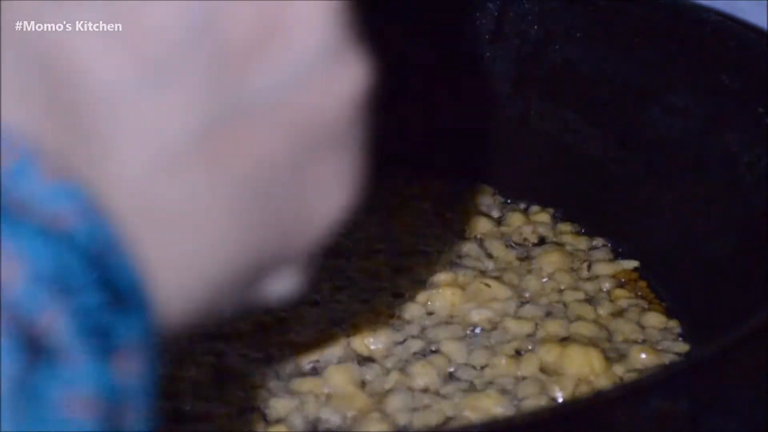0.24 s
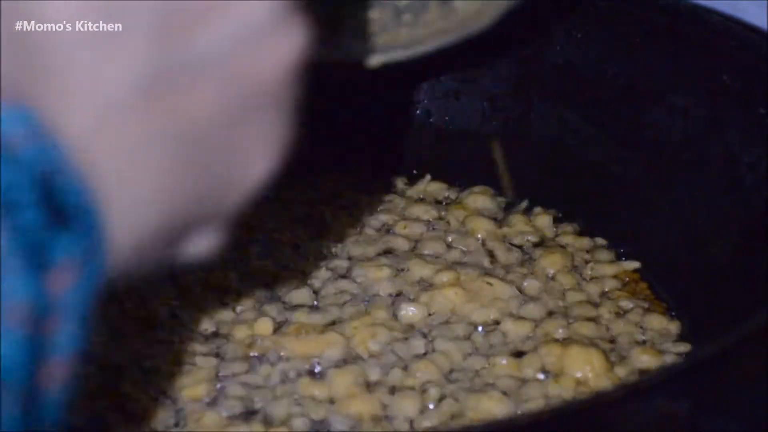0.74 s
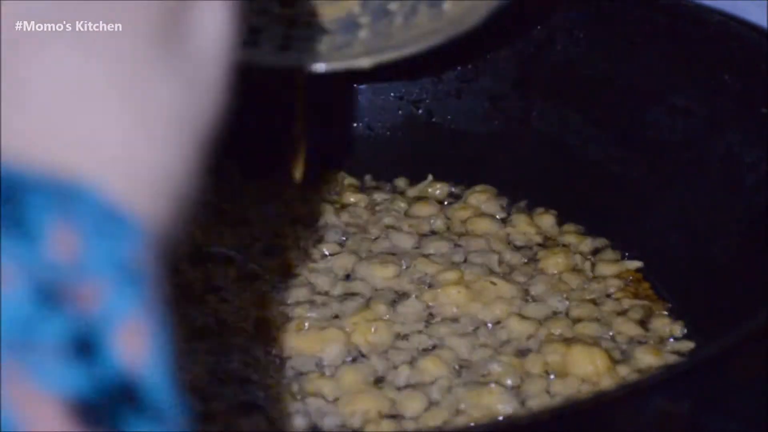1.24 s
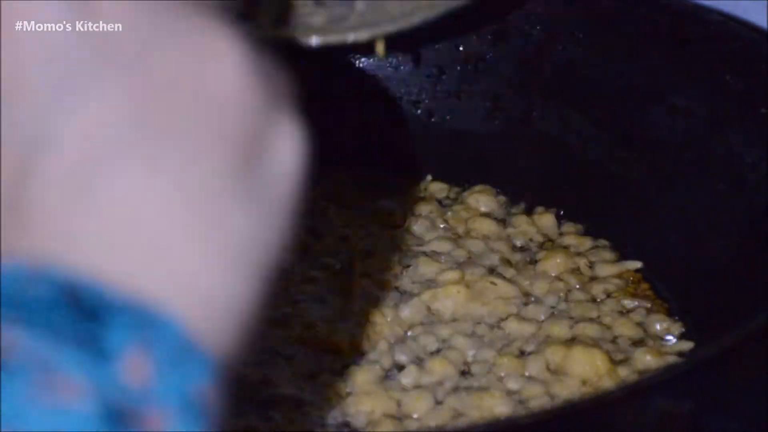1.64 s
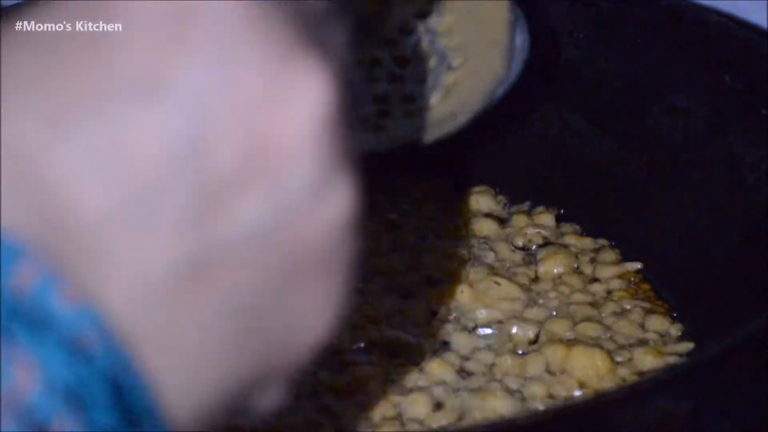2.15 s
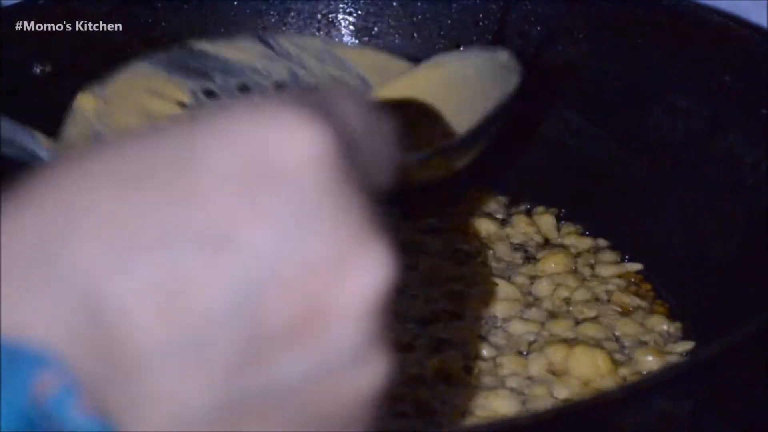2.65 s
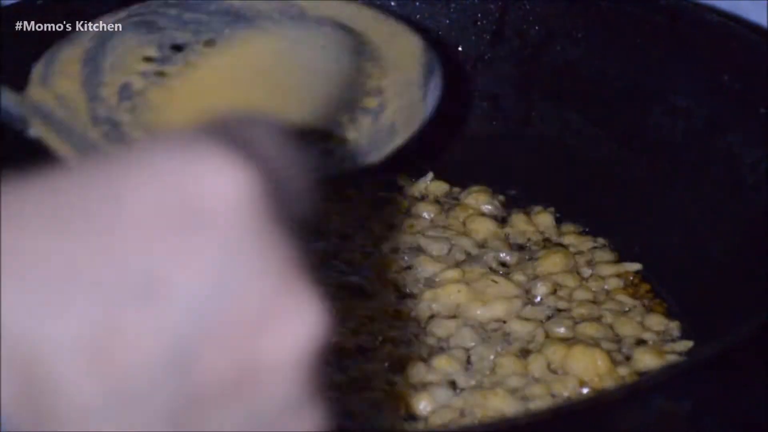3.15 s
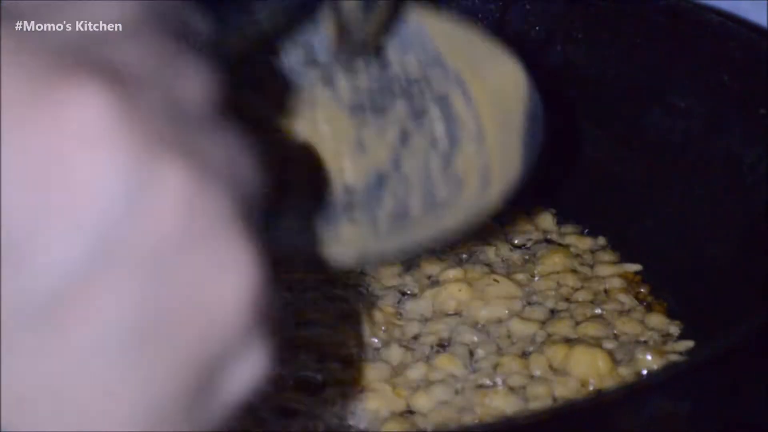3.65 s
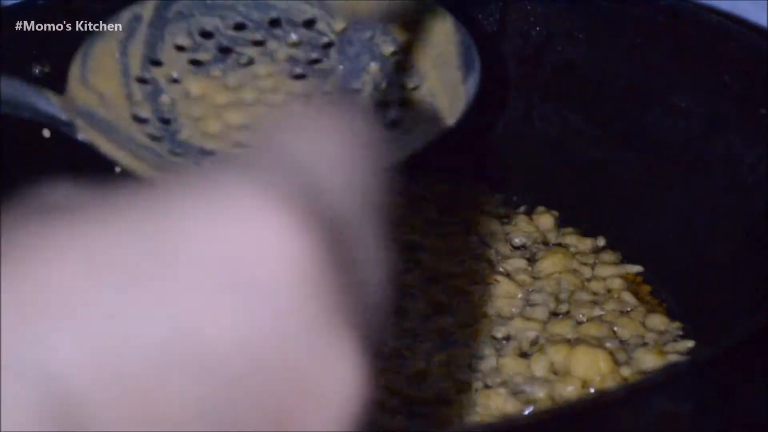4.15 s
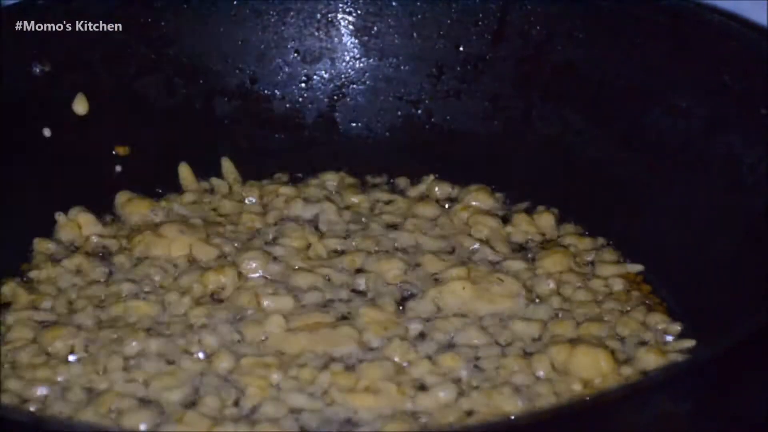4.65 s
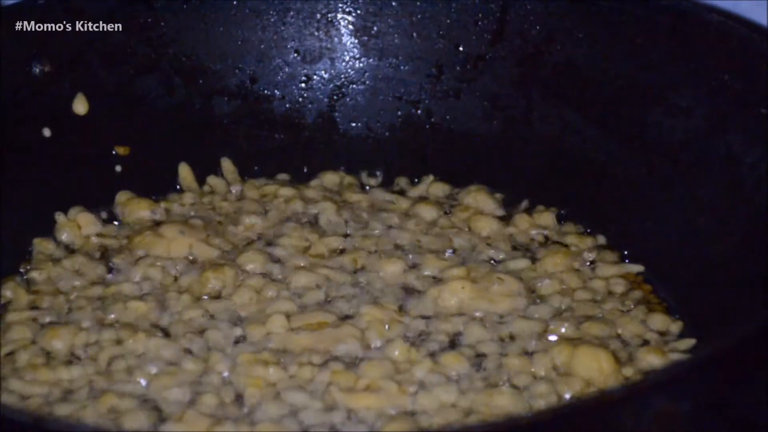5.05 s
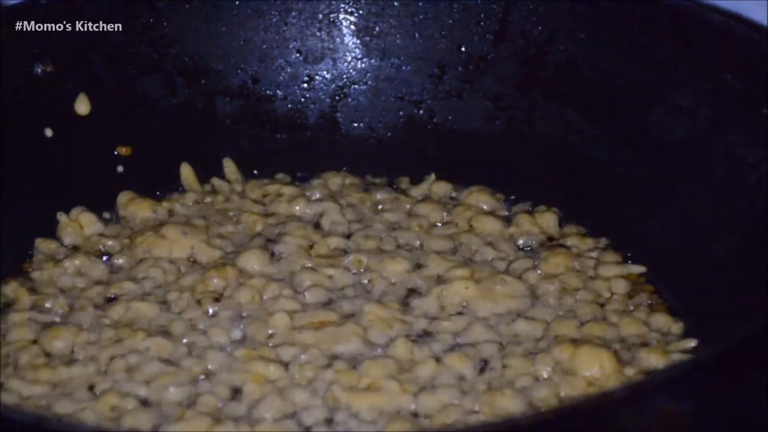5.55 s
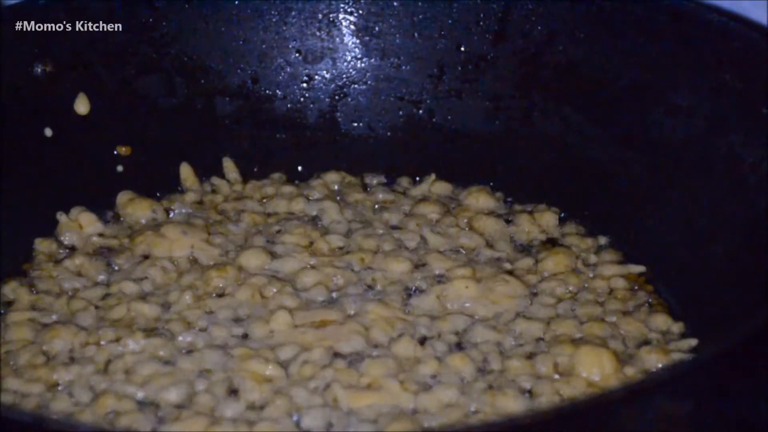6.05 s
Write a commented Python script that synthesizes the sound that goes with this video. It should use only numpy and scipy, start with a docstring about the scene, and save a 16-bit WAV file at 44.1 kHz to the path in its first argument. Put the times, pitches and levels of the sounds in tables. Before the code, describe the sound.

A metal spoon taps a wok's rim four times quickly, then is put down with a clink and soft knocks.

```python
"""Knocking a spoon on a wok

In a small kitchen, a slotted metal spoon hits a wok's rim four times to shake off batter. Each tap
makes the spoon clack and the wok ring. The spoon scrapes and ticks lightly around the taps, then is
put down with a clink and a few soft knocks. Hits are short puffs of shaped noise, and ringing is a
sum of fading tones. Faint squeaks and a steady room noise lie underneath."""
import sys
import numpy as np
from scipy import signal
from scipy.fft import rfft, irfft
from scipy.io import wavfile
from scipy.ndimage import uniform_filter1d

SR = 44100
rng = np.random.default_rng(int(sys.argv[2]) if len(sys.argv) > 2 else 0)


def to_wav(sig):
    """Store sig (one row per channel, or 1-D mono) as 16-bit WAV at the path in sys.argv[1].

    Samples outside -1..1 are clipped; the rate is SR.
    """
    pcm = np.clip(np.atleast_2d(sig), -1, 1) * 32767
    pcm = np.round(pcm).astype(np.int16)
    wavfile.write(sys.argv[1], SR, pcm.T)  # frames by channels


N = 278271

# Levels in the tables are relative. A t60 is the time a sound takes to fade by 60 dB.
# Hard taps on the rim, each with a bright zing: start_s, level_db, zing_hz, zing_db
RIM_TAPS = [(1.3150, -7.5, 6354, -6.5), (1.4700, -4.5, 7970, -3.5), (1.6468, -2.5, 6187, -1),
            (1.8374, -1.5, 7936, -5.5)]
# The spoon's resonances (pitches it likes to shake at), damped by the hand: pitch_hz, width_hz, level_db
HELD_SPOON = [(738.5, 106, -8), (930.4, 152, -5.5), (1183, 238, -6.5), (1428.3, 72.5, 1), (1979, 79, -4),
              (2256, 142, 1.5), (2390, 126, 0.5), (2846, 330, -0.5), (3186, 80, -2.5), (3693, 225, -8),
              (3906, 148, 1.5), (4720, 235, -8.5), (5995, 375, -5.5), (6184, 197, -5), (6940, 200, -20.5),
              (7100, 120, -15.5), (8196, 490, -5.5), (9930, 256, -8), (10150, 136, -18), (11170, 580, -14),
              (12020, 740, -13)]
# The tone colour of metal cracking on metal: frequency_hz, level_db
CRACK_COLOUR = [(40, -49), (150, -22), (300, -29), (500, -4), (640, -9), (750, 0), (1500, 2), (3000, 4.5),
                (5000, 0), (8000, -18.5), (11500, -12), (14000, -5), (16000, -24.5)]
# What a tap sends into the room, all directions together: frequency_hz, level_db
RADIATED_COLOUR = [(40, -55), (150, -32), (400, -23), (520, -10), (640, -13), (750, -7.5), (1100, 0),
                   (1800, 0), (2700, -1), (3400, -6.5), (4700, -5), (5500, -8), (6200, -6), (8200, -12),
                   (9500, -10.5), (14000, -17), (16000, -33)]
# The wok's ringing tones: pitch_hz, level_db, t60_s
WOK_TONES = [(735, -9, .3), (1175, -8, .26), (1265, -10, .36), (1335, -9, .26), (1518, -6, .25),
             (1778, -7, .24), (1902, -9, .26), (2228, -7, .22), (2654, -2, .24), (2804, -7, .2),
             (3628, -3, .39), (3661, 0, .33), (3700, -1, .32), (3750, -4, .3), (3950, -1, .22),
             (4530, -9, .17), (6222, -12, .19), (9308, -18, .21)]
# Light touches of the held spoon on the wok: start_s, level_db, centre_hz, zing_hz
LIGHT_TOUCHES = [(0.301, -48.5, 3000, 7200), (0.777, -44.5, 3350, 3885), (2.492, -45, 3450, 4140),
                 (2.7956, -29, 1600, 3380), (4.045, -53, 6000, 6620), (4.2904, -20.5, 2575, 3965)]
# The tone colour of a bright tick: frequency_hz, level_db
TICK_COLOUR = [(200, -48), (1500, -12.5), (4500, 9.5), (6500, 17.5), (9000, 10), (12000, 7.5), (16000, -16)]
# Slips of the spoon's edge along the wok: start_s, level_db, decay_s
EDGE_SLIPS = [(.990, -28, 0.011), (1.003, -27, 0.0206), (1.041, -34, 0.0107)]
# The spoon lands and bounces: start_s, level_db, hardness (0 soft to 1 hard)
SPOON_LANDINGS = [(4.9594, -31, .02), (4.9746, -26.5, 0.83), (5.0399, -25, 0.98)]
# The tones of the spoon ringing freely: pitch_hz, level_db, t60_s
CLINK_TONES = [(499, -9.5, 0.106), (839.3, 4, 0.193), (1200, -5.5, 0.12), (1549, 7.5, 0.159),
               (2234, 0.5, 0.16), (2584, 12, 0.075), (3890, -2.5, 0.15), (5451, 1, 0.186),
               (5510, -4.5, 0.142), (7330, -4, 0.132)]
# Dull knocks afterwards, each with a ping: start_s, level_db, centre_hz, decay_s, ping_db
WORKTOP_KNOCKS = [(5.309, -36.5, 1104, 0.015, -17.5), (5.321, -28, 740, 0.0149, -24.5),
                  (5.5593, -30, 774, 0.011, 3)]
# The ping of a knocked, well-damped utensil: pitch_hz, level_db, t60_s
PING_TONES = [(2460, 0.5, 0.043), (3196, -6, 0.067), (4249, -1, 0.036), (4474, -6, 0.031),
              (7300, -16, .035)]
# Faint, far-off squeaks: start_s, length_s, pitch_hz, level_db
FAR_SQUEAKS = [(3.62, 0.1796, 1122, -57.5), (3.82, 0.078, 1127, -57), (3.889, 0.0733, 1344, -57),
               (4.044, 0.053, 1353, -56), (4.18, 0.0596, 1851, -64)]
# A thin whistle that comes and goes: start_s, length_s, level_db
FAR_WHISTLES = [(0.58, 0.47, -77), (2.08, 0.143, -63.5), (2.24, 0.095, -68)]
# A soft, very low bump: start_s, length_s, pitch_hz, level_db
LOW_BUMPS = [(4.6, .12, 44, -66)]
# The tone colour of the air noise: frequency_hz, level_db
AIR_COLOUR = [(25, -9), (50, 0.5), (100, -3), (180, 1.5), (270, -4), (400, -1), (700, -1), (1200, 1),
              (2000, -3), (3200, -10.5), (4800, -17.5), (7000, -13), (10000, -20.5), (15500, -29)]
# Resonances in the room noise: pitch_hz, width_hz, level_db
DRONE_PEAKS = [(108.6, 3.85, 0.5), (186.2, 13, -3.5), (340.5, 21.6, 7), (520, 51.8, 1.5), (561.7, 14, -4.5),
               (737.6, 7.8, 9.5), (766, 13, -14.5)]
# How long the kitchen echoes: frequency_hz, t60_s
ECHO_TIMES = [(200, 0.387), (1000, 0.446), (3000, 0.385), (7000, 0.349), (14000, 0.245)]


def taps(clack_db=5, crack_db=-4, crack_decay_s=0.00197, zing_decay_s=0.00322, zing_room_db=-9):
    """The spoon hits the rim: it clacks, the contact cracks and zings, and the room answers."""
    _, hz = axes()
    treble_octaves = np.clip(np.log2((hz + 1) / 3500), 0, 2)
    direct, into_room = np.zeros((2, N))
    for start_s, db, zing_hz, zing_db in RIM_TAPS:
        treble_db = (-1.16 + 0.148 * db) * treble_octaves  # a harder tap is brighter
        crack = amp(crack_db) * burst(crack_decay_s, curve(CRACK_COLOUR, hz))
        zing = amp(zing_db) * burst(zing_decay_s, hump(hz, zing_hz, octaves=0.0753))
        radiated = burst(crack_decay_s, curve(RADIATED_COLOUR, hz) + treble_db)
        clack = amp(clack_db) * spoon_clack()
        add(direct, start_s, amp(db) * (zing + coloured(clack + crack, treble_db)))
        add(into_room, start_s, amp(db) * (amp(zing_room_db) * zing + radiated))
    return direct + kitchen_echo(into_room)


def spoon_clack(decay_s=0.00191, valley_db=-20):
    """The blow spreads through the spoon's broad resonances, which the hand quickly damps."""
    _, hz = axes()
    valley_power = amp(valley_db + curve(RADIATED_COLOUR, hz)) ** 2  # fills the gaps between peaks
    return burst(decay_s, 10 * np.log10(peak_power(HELD_SPOON, hz) + valley_power))


def wok_ring(level_db=-9):
    """The loaded wok rings briefly after each tap, equally strongly each time."""
    out = np.zeros(N)
    for start_s, *_ in RIM_TAPS:
        add(out, start_s, amp(level_db) * ring(*np.transpose(WOK_TONES)))
    return out


def touches(level_db=4, zing_db=-1, ring_db=-4, t60_share=0.356, echo_db=-6.5):
    """The held spoon clicks on the wok, waking the tones near the click's pitch but also damping them."""
    _, hz = axes()
    wok_hz, wok_db, t60_s = np.transpose(WOK_TONES)
    out = np.zeros(N)
    for start_s, db, centre_hz, zing_hz in LIGHT_TOUCHES:
        decay_s = 0.00477 * 2 ** ((-21.5 - db) / 26.5)  # a firm touch is short, a faint one brushes longer
        zing = amp(zing_db) * burst(decay_s, hump(hz, zing_hz, octaves=0.07))
        click = contact(decay_s, centre_hz, octaves=0.57, tick_db=-4.5)
        woken_db = wok_db + hump(wok_hz, centre_hz, octaves=0.134)
        ringing = amp(ring_db) * ring(wok_hz, woken_db, t60_share * t60_s)
        add(out, start_s, amp(db + level_db) * (click + zing + ringing))
    return out + amp(echo_db) * kitchen_echo(out)


def scrape(pitch_hz=2879, overtone_db=-9, echo_db=-6):
    """The spoon's edge sticks and slips; each slip is a short, rough squeal with two overtones."""
    _, hz = axes()
    out = np.zeros(N)
    for start_s, db, decay_s in EDGE_SLIPS:
        squeal = sum(amp(overtone_db) ** np.log2(k) * burst(decay_s, hump(hz, k * pitch_hz, 0.061))
                     for k in (1, 2, 3))
        click = contact(decay_s, pitch_hz, octaves=0.203, tick_db=-9)
        add(out, start_s, amp(db) * unit(squeal + click))
    return out + amp(echo_db) * kitchen_echo(out)


def landings(level_db=5, thud_db=-4, clink_db=2.5, echo_db=-4, ring_echo_db=-11):
    """Once let go, the spoon thuds and clinks; a harder landing is higher, shorter and rings more."""
    soft_hz, hard_hz = 856, 1742
    soft_decay_s, hard_decay_s = 0.0071, 0.00304
    _, hz = axes()
    hits, rings = np.zeros((2, N))
    for start_s, db, hardness in SPOON_LANDINGS:
        centre_hz = soft_hz * (hard_hz / soft_hz) ** hardness
        decay_s = soft_decay_s * (hard_decay_s / soft_decay_s) ** hardness
        muffled_db = -27 * (1 - hardness) ** 2
        zing_db = -2 + 5 * hardness ** 4
        zing = amp(zing_db) * burst(decay_s, hump(hz, 1.788 * centre_hz, octaves=0.08))
        thud = amp(thud_db) * burst(soft_decay_s, hump(hz, centre_hz=800, octaves=0.35))
        click = contact(decay_s, centre_hz, octaves=0.97, tick_db=-12 + muffled_db)
        clink = amp(clink_db + muffled_db) * ring(*np.transpose(CLINK_TONES))
        add(hits, start_s, amp(db + level_db) * (thud + click))
        add(rings, start_s, amp(db + level_db) * (zing + clink))
    return hits + rings + kitchen_echo(amp(echo_db) * hits + amp(ring_echo_db) * rings)


def knocks(level_db=5, echo_db=-4, ping_echo_db=-13):
    """Dull knocks on the worktop, each with a short ping from the utensil."""
    thuds, pings = np.zeros((2, N))
    for start_s, db, centre_hz, decay_s, ping_db in WORKTOP_KNOCKS:
        thud = contact(decay_s, centre_hz, octaves=0.91, tick_db=-19.5)
        add(thuds, start_s, amp(db + level_db) * thud)
        add(pings, start_s, amp(db + level_db + ping_db) * ring(*np.transpose(PING_TONES)))
    return thuds + pings + kitchen_echo(amp(echo_db) * thuds + amp(ping_echo_db) * pings)


def squeaks():
    """A run of rough squeaks that slide upward; the longer ones rise less."""
    out = np.zeros(N)
    for start_s, length_s, hz, db in FAR_SQUEAKS:
        rise = 0.0535 * (0.0778 / length_s) ** 2
        add(out, start_s, amp(db) * thin_tone(length_s, hz, rise, waver=0.0129, octave_db=-11))
    return out


def whistles(base_hz=3238, sag_hz_per_s=28):
    """A nearly pure whistle, a little lower each time it comes back."""
    out = np.zeros(N)
    for start_s, length_s, db in FAR_WHISTLES:
        hz = base_hz - sag_hz_per_s * start_s
        add(out, start_s, amp(db) * thin_tone(length_s, hz, rise=0, waver=0.00303, octave_db=-41.5))
    return out


def low_bump():
    """A few soft waves of deep bass."""
    out = np.zeros(N)
    for start_s, length_s, hz, db in LOW_BUMPS:
        t = np.arange(int(length_s * SR)) / SR
        add(out, start_s, amp(db) * np.hanning(len(t)) * np.sin(2 * np.pi * hz * t))
    return out


def kitchen_echo(sound, first_wall_s=0.004, early_db=-2, early_decay_s=0.0273):
    """Sound bounces off the near walls in many quick echoes; the highest pitches die first."""
    t = np.arange(SR) / SR
    echoes = rng.choice([-1, 1], SR) * (rng.random(SR) < 0.15) * (t > first_wall_s)
    echoes = echoes * (1 + amp(early_db) * np.exp(-t / early_decay_s))
    hz, when_s, bands = signal.stft(echoes, SR, nperseg=256)
    bands = bands * np.exp(-np.log(1000) * when_s / curve(ECHO_TIMES, hz)[:, None])
    fading_echoes = unit(signal.istft(bands, SR, nperseg=256)[1])
    return signal.fftconvolve(sound, fading_echoes)[:N]


def room_noise(air_db=-62.242, drone_db=-73):
    """Steady air noise, with a faint drone at a few pitches."""
    hz = np.fft.rfftfreq(N, 1 / SR)
    air = irfft(rfft(rng.standard_normal(N)) * amp(curve(AIR_COLOUR, hz)), N)
    drone = irfft(rfft(rng.standard_normal(N)) * np.sqrt(peak_power(DRONE_PEAKS, hz)), N)
    return np.sqrt(N) * (amp(air_db) * unit(air) + amp(drone_db) * unit(drone))


def contact(decay_s, centre_hz, octaves, tick_db):
    """A light hit: one broad resonance with a bright tick on top."""
    _, hz = axes()
    body = burst(decay_s, hump(hz, centre_hz, octaves))
    return body + amp(tick_db) * burst(decay_s, curve(TICK_COLOUR, hz))


def burst(decay_s, colour_db):
    """Countless quickly dying vibrations blur into a puff of noise with the given tone colour."""
    t, _ = axes()
    spectrum = rfft(rng.standard_normal(len(t)) * np.exp(-(t / decay_s) ** 1.4))
    even = irfft(spectrum / (abs(spectrum) + 1e-12), len(t))  # all frequencies equally strong
    puff = even * np.exp(-t / (10 * decay_s))
    return unit(coloured(puff, colour_db))


def ring(hz, db, t60_s):
    """Struck metal rings with pure tones, each fading at its own speed."""
    t, _ = axes()
    cycles = hz[:, None] * t + rng.random((len(hz), 1))
    fade = np.exp(-np.log(1000) * t / t60_s[:, None])
    return unit(amp(db) @ (fade * np.sin(2 * np.pi * cycles)))


def thin_tone(length_s, hz, rise, waver, octave_db):
    """An unsteady tone that swells and fades; rise and waver are fractions of its pitch."""
    size = int(length_s * SR)
    wobble = unit(uniform_filter1d(rng.standard_normal(size), size=300)) * np.sqrt(size)
    pitch_hz = hz * (1 + rise * np.linspace(-0.5, 0.5, size) + waver * wobble)
    phase = 2 * np.pi * np.cumsum(pitch_hz) / SR
    return signal.windows.tukey(size, 0.7) * (np.sin(phase) + amp(octave_db) * np.sin(2 * phase))


def coloured(sound, colour_db):
    """Turns each frequency up or down, with no sound ahead of the hit (a minimum-phase filter)."""
    size = len(sound)
    cepstrum = irfft(np.log(amp(np.maximum(colour_db, -80))), size)
    cepstrum[1:size // 2] *= 2
    cepstrum[size // 2 + 1:] = 0
    return irfft(rfft(sound) * np.exp(rfft(cepstrum)), size)


def hump(hz, centre_hz, octaves, skirt_db=2.5):
    """One resonance as a hill-shaped curve in dB; octaves sets its width."""
    away = np.log2((hz + 1) / centre_hz)
    return -20 * np.log10(1 + 0.5 * (away / octaves) ** 2) - skirt_db * away ** 2


def peak_power(peaks, hz):
    """The power that a set of resonances gives each frequency."""
    return sum(amp(db) ** 2 / (1 + (2 * (hz - pitch) / width) ** 2) ** 2 for pitch, width, db in peaks)


def curve(points, hz):
    """Joins (frequency_hz, value) points with straight lines on an octave scale."""
    point_hz, value = np.transpose(points)
    return np.interp(np.log(hz + 1), np.log(point_hz + 1), value)


def axes():
    """The times and frequencies of a half-second sound."""
    return np.arange(SR // 2) / SR, np.fft.rfftfreq(SR // 2, 1 / SR)


def amp(db):
    """Turns decibels into a number to multiply by."""
    return 10 ** (np.asarray(db) / 20)


def unit(sound):
    """Scales a sound to energy 1."""
    return sound / np.sqrt(np.sum(sound ** 2) + 1e-20)


def add(mix, start_s, sound):
    """Adds a sound to the mix at its start time."""
    part = mix[round(start_s * SR):][:len(sound)]
    part += sound[:len(part)]


def scene(far_db=-4):
    """Spoon and wok over the room noise, with far-off squeaks and whistles blurred by the room."""
    far = squeaks() + whistles()
    far = amp(far_db) * (far + kitchen_echo(far))
    spoon_and_wok = taps() + wok_ring() + touches() + scrape() + landings() + knocks()
    return (spoon_and_wok + far + low_bump() + room_noise())[None]


def record(dry, cutoff_hz=15900):
    """Takes away the very highest treble."""
    low_pass = signal.firwin(511, cutoff_hz, window=("kaiser", 9), fs=SR)
    return signal.oaconvolve(dry, low_pass[None], "same")


dry = scene()
out = record(dry)
to_wav(out)
```